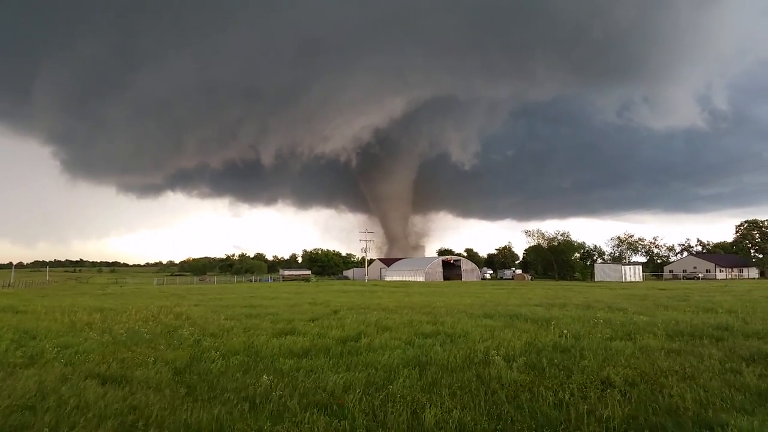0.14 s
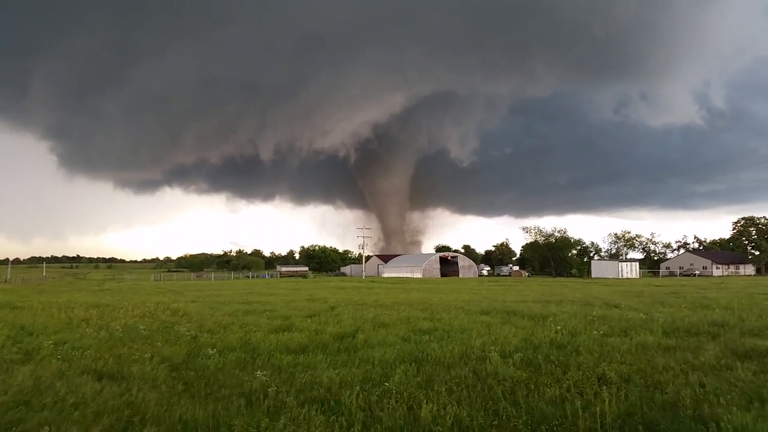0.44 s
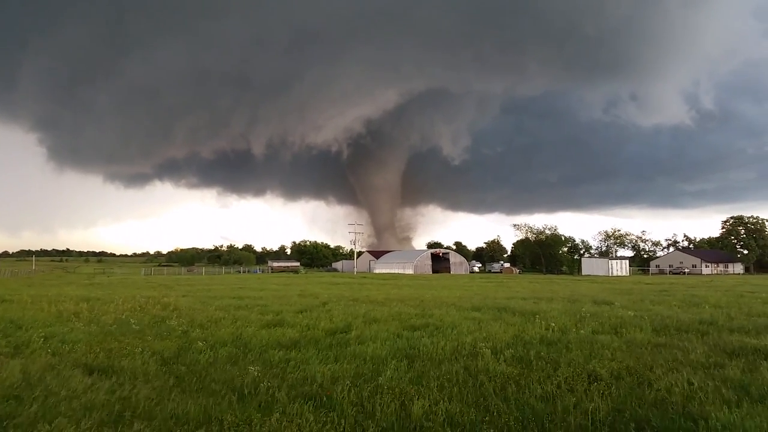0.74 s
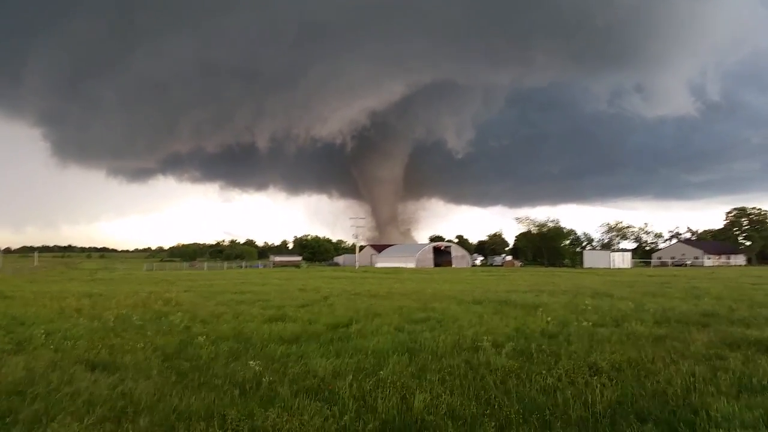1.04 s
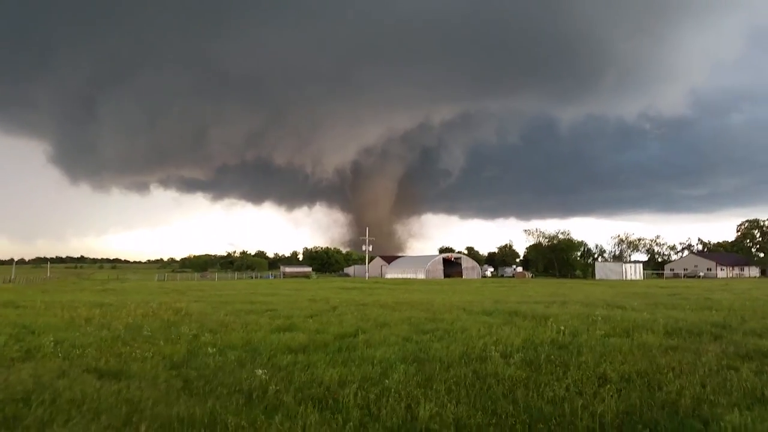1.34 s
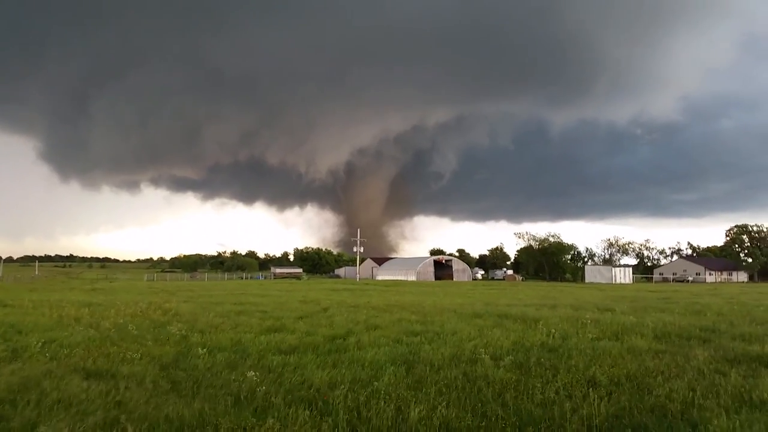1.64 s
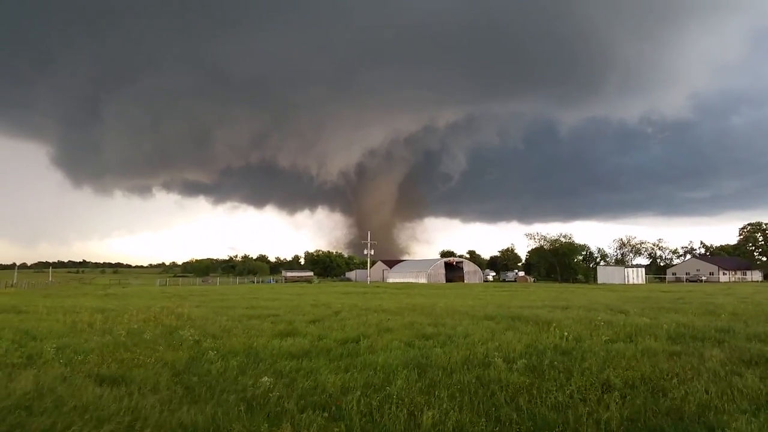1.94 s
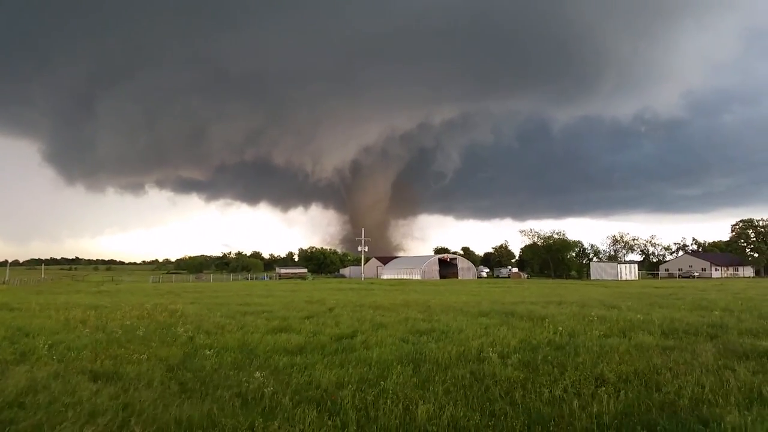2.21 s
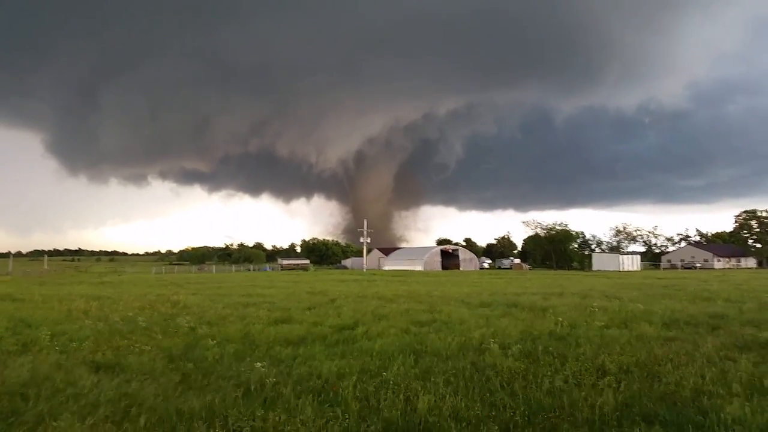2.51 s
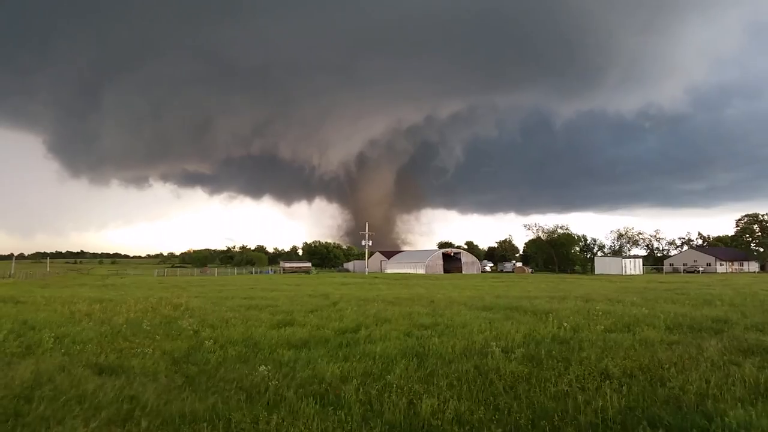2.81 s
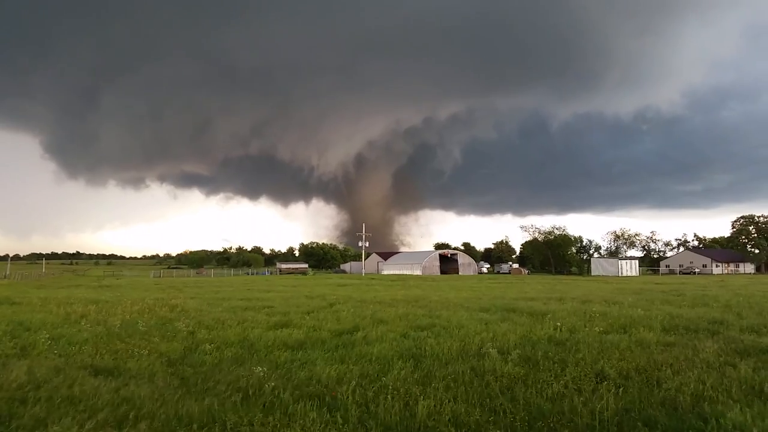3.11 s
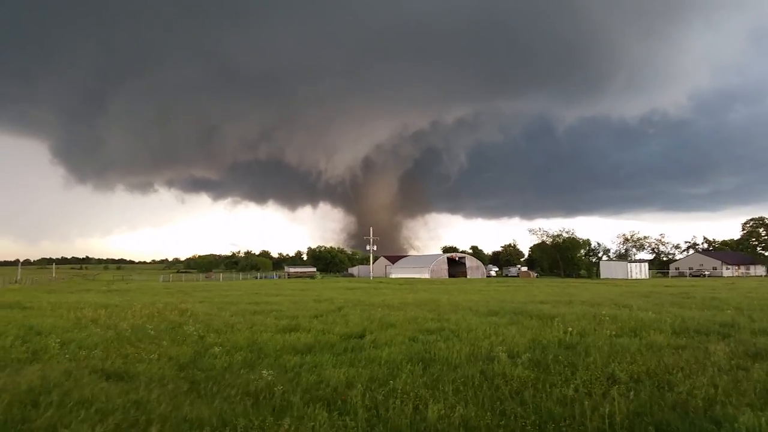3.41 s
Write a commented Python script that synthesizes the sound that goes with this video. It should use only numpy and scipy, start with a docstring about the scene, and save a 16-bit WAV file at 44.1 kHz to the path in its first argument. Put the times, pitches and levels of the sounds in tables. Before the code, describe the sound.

Wind noise dominates throughout: deep, uneven rumbling in both channels, often stronger on the right, with sharp buffets around 1.4, 2.5 and 2.8 seconds, over a soft rush across open farmland, easing at the end.

```python
"""Gusty storm wind crosses a hand-held camera in open farmland: each microphone port rumbles in its own
turbulence, made of coloured noise, and stronger wind adds a brighter flutter of random grains.
Single eddies slap a port with a low swing of pressure and a crackle of sharp kinks.
Behind it shaped noise makes the rush of wind over the field and a thin hiss that flares once to a sizzle.
One snap and a few ticks on the camera body are sudden starts that decay exponentially."""
import sys
import numpy as np
from scipy import signal
from scipy.fft import rfft, irfft
from scipy.io import wavfile
from scipy.ndimage import uniform_filter1d

SR = 44100
rng = np.random.default_rng(int(sys.argv[2]) if len(sys.argv) > 2 else 0)


def dump_mix(stems):
    """Bounce the given channels to the path in sys.argv[1] as a 16-bit WAV at rate SR."""
    frames = np.atleast_2d(stems).T  # one column per channel
    limited = np.clip(frames, -1, 1)  # hard clip at full scale
    pcm = np.round(limited * 32767).astype(np.int16)
    wavfile.write(sys.argv[1], SR, pcm)


N = 156996  # length in samples
TOP_HZ = 15800  # upper limit of the camera's sound


def undb(db):
    """Decibels to amplitude ratio: 20 dB is a factor of ten."""
    return 10 ** (np.asarray(db) / 20)


def curve(rows):
    """Linear interpolation: rows of (s, value) joined by straight lines."""
    return np.interp(np.arange(N) / SR, *np.array(rows).T)


def colour(x, points):
    """Spectral shaping by (Hz, dB) points, falling away outside them; keeps white noise at its level."""
    hz, db = np.array(points).T
    f = np.maximum(np.fft.rfftfreq(len(x), 1 / SR), 1)
    gain = undb(np.interp(np.log(f), np.log(hz), db))
    gain = gain * np.minimum(f / hz[0], 1) * np.minimum(hz[-1] / f, 1) ** 2
    return irfft(rfft(x) * gain / np.sqrt(np.mean(gain ** 2)), len(x))


def noise(points):
    """Coloured noise of level 1: white noise through a spectral shape."""
    return colour(rng.standard_normal(N), points)


def walk(hz):
    """Low-passed noise: smooth chance with spread 1 that changes about hz times a second."""
    f = np.fft.rfftfreq(N, 1 / SR)
    x = irfft(rfft(rng.standard_normal(N)) * np.exp(-(f / hz) ** 2), N)
    return x / x.std()


def even(x, span_s):
    """Division by the running power: holds the level near 1 over each span, leaving single swings free."""
    size = max(int(span_s * SR), 2)
    power = uniform_filter1d(uniform_filter1d(x ** 2, size), size)
    return x / np.sqrt(np.abs(power) + 1e-12)


def pan(db):
    """Intensity stereo: left and right gains for a level difference, at constant mean power."""
    gain = undb(np.array([[db], [-db]]) / 2)
    return gain / np.sqrt(np.mean(gain ** 2))


def fade(at_s, decay_s):
    """Exponential decay after a sudden start."""
    t = np.arange(N) / SR
    return (t >= at_s) * np.exp(-np.abs(t - at_s) / decay_s)


def port_wind(wind_db, flutter_db, flicker_db):
    """Turbulent pressure: large eddies rumble at a port; small ones flutter, riding on the large swings."""
    # Colour of the slow pressure swings. Each row: frequency in Hz, relative density in dB per Hz.
    rumble_colour = [(25, -11.5), (45, -1), (110, 1), (180, -5), (290, -13.5), (420, -26), (1500, -71.5)]
    # Colour of the fine flutter. Each row: frequency in Hz, relative density in dB per Hz.
    flutter_colour = [(100, -16.5), (250, 1), (380, 3.5), (600, -3.5), (1050, -17), (2000, -33),
                      (3000, -44.5), (5000, -70.5)]
    rumble_db, rumble_flicker_db, rumble_flicker_hz = 2, 3, 24.3
    breeze_db, flutter_growth = -13, 1.13  # reference wind strength; dB of flutter per dB of wind
    flutter_rate_hz = 70
    grains_per_s = 700  # tiny eddies that make up the flutter

    swings = even(noise(rumble_colour), span_s=0.025)
    surge = walk(rumble_flicker_hz)
    rumble = swings * undb(wind_db + rumble_db + rumble_flicker_db * surge)

    # spurts follow the surge in part and are softly limited to +-2
    spurts = 2 * np.tanh((.5 * surge + 0.61 * walk(flutter_rate_hz)) / 2)
    ride = np.sqrt(0.39 + 0.68 * swings ** 2)
    present = rng.random(N) < grains_per_s / SR
    grains = rng.standard_normal(N) * present * np.sqrt(SR / grains_per_s)
    level_db = flutter_db + flutter_growth * (wind_db - breeze_db) + flicker_db * spurts
    flutter = colour(grains, flutter_colour) * ride * undb(level_db)
    return rumble + flutter


def field():
    """Broadband turbulence noise: wind rushes over the open field, flickering in level on each side."""
    # Colour of the rush. Each row: frequency in Hz, relative density in dB per Hz.
    rush_colour = [(20, 8), (300, 7.5), (600, -14), (1000, -11), (1600, -15.5), (2500, -22.5), (4500, -53)]
    # Course of the rush. Each row: time in seconds, level in dB before flicker and panning.
    rush_db = [(0, -34), (.5, -42.5), (1.1, -37.5), (2.0, -40.5), (2.5, -37), (3.1, -44), (3.4, -54.5)]
    flicker_db, flicker_hz, left_over_right_db = 3.4, 20, 10.5
    sides = [noise(rush_colour) * undb(curve(rush_db) + flicker_db * walk(flicker_hz)) for _ in range(2)]
    return pan(left_over_right_db) * np.array(sides)


def hiss():
    """Amplitude-modulated noise: a thin hiss comes in puffs shared by both ports, each with its own colour."""
    # Course of the hiss. Each row: time in seconds, level in dB before flicker and port gain.
    puff_db = [(.3, -69), (.38, -78), (.88, -75.5), (1.2, -67.5), (1.68, -70), (1.94, -78.5), (2.1, -69),
               (2.26, -76.5), (2.36, -64.5), (2.6, -70), (2.7, -77.5), (3.25, -75.5), (3.45, -87.5)]
    # Colour at the left port. Each row: frequency in Hz, relative density in dB per Hz.
    left_colour = [(4600, -0.5), (5500, -12.5), (8000, -5.5), (9800, -18), (11800, -12), (15500, -19.5)]
    # Colour at the right port. Each row: frequency in Hz, relative density in dB per Hz.
    right_colour = [(3000, -11.5), (9600, -26), (11200, 1.5), (15800, -23.5)]
    left_db, flicker_db, flicker_hz = 0.5, 3, 32
    puffs = undb(curve(puff_db) + flicker_db * walk(flicker_hz))
    left = noise(left_colour) * puffs * undb(left_db)
    right = noise(right_colour) * puffs
    return np.array([left, right])


def buffets():
    """Pressure transients: an eddy swells and dies in milliseconds, a low swing with a crackle of kinks."""
    # Eddies that slap a port. Each row: centre in seconds, half length (to 1/e) in seconds,
    # relative thud level in dB, relative crackle level in dB, port (0 left, 1 right).
    eddies = [(0.143, .004, -11.5, -35.5, 1), (0.188, 0.0043, -6, -30.5, 0), (0.365, 0.001, -3, -21.5, 1),
              (0.398, 0.0035, -5.5, -40, 1), (0.41, 0.0046, -20.5, -28.5, 1), (0.601, 0.0042, -9, -42, 1),
              (1.054, 0.0079, -15, -35.5, 0), (1.289, 0.0028, -12, -29.5, 1), (1.313, 0.0053, -5, -34, 1),
              (1.389, 0.0032, 0.5, -30.5, 1), (1.602, 0.0068, -17.5, -28.5, 1),
              (1.6365, 0.0047, -16, -25.5, 1), (1.644, 0.003, -11.5, -28.5, 1),
              (1.733, 0.014, -15, -32.5, 1), (1.754, 0.0062, -14.5, -29, 1), (1.764, 0.0055, -18, -29, 1),
              (2.136, 0.0028, -13, -29, 1), (2.2694, 0.0027, -12.5, -22, 1), (2.4, 0.0061, -8, -29, 1),
              (2.42, 0.0076, -24, -28.5, 1), (2.447, 0.0053, -11.5, -28, 1),
              (2.5004, 0.0046, -9.5, -13.5, 1), (2.6124, 0.0025, -30, -21.5, 0),
              (2.624, 0.0033, -9, -25, 0), (2.64, 0.0028, -2, -29.5, 0), (2.7685, 0.0015, -6, -23.5, 1),
              (2.772, 0.00086, -18, -22.5, 1), (2.7755, 0.0013, -14.5, -20, 1),
              (2.7855, 0.0009, -15, -31, 1), (2.794, 0.004, -12.5, -27, 1), (2.903, 0.0066, -18, -32.5, 1),
              (2.932, 0.0013, -29.5, -32.5, 1), (3.543, 0.006, -15, -34, 0)]
    # Colour of the crackle. Each row: frequency in Hz, relative density in dB per Hz.
    crackle_colour = [(150, -2), (360, 5.5), (1000, -4), (1700, -11), (2700, -15.5), (4200, -31.5),
                      (7000, -59)]
    thud_hz, thud_s = 124, 0.0037  # mean pitch, shortest half length
    kink_gap_s, kink_size, grit_db = .0025, 1, -24  # spacing, size beside the central kink, noise between
    crackle_gain_db = 10.5
    # harder and shorter eddies crackle brighter
    base_edge_hz, edge_at_db, edge_db_per_octave = 2550, -20, 7.5

    t, out = np.arange(N) / SR, np.zeros((2, N))
    grit = rng.standard_normal(N) * undb(grit_db)
    order = np.arange(-6, 7)  # kinks counted from the central one
    chance = rng.standard_normal((len(eddies), 2, len(order)))
    swings = rng.random((len(eddies), 2))
    for eddy, (late, size), (octave, turn) in zip(eddies, chance, swings):
        at_s, half_s, thud_db, crackle_db, port = eddy
        near = np.abs(t - at_s) < .06
        age = t[near] - at_s

        pitch_hz = thud_hz * 2 ** (octave - .5)
        swing = np.sqrt(2) * np.cos(2 * np.pi * (pitch_hz * age + turn))
        thud = swing * np.exp(-(age / np.hypot(thud_s, half_s)) ** 2)

        # band-limited impulses; only the central kink has a fixed time and size
        when = kink_gap_s * np.where(order, order + late / 2, 0)
        kinks = np.sinc((age[:, None] - when) * SR) @ np.where(order, kink_size * size, 1)
        crackle = colour((kinks + grit[near]) * np.exp(-(age / half_s) ** 2), crackle_colour)
        octaves_up = (crackle_db - edge_at_db) / edge_db_per_octave
        edge_hz = min(base_edge_hz * 2 ** octaves_up * (kink_gap_s / half_s) ** 0.16, TOP_HZ)
        crackle = signal.sosfilt(signal.butter(2, edge_hz, fs=SR, output="sos"), crackle)
        crackle = crackle * np.sqrt(half_s * SR) / np.linalg.norm(crackle)  # level 1 over a half length

        out[round(port), near] += thud * undb(thud_db) + crackle * undb(crackle_gain_db + crackle_db)
    return out


def snap():
    """Step excitation: pressure jumps suddenly, then relaxes exponentially."""
    at_s, decay_s = 1.1401, 0.01
    level_db, left_over_right_db = -11.5, 16
    return pan(left_over_right_db) * undb(level_db) * fade(at_s, decay_s)


def ticks():
    """Impulsive excitation: each tiny dry tick on the camera body is noise with a very fast decay."""
    # Ticks on the body. Each row: start in seconds, level in dB before panning,
    # left-minus-right level in dB.
    body_ticks = [(1.1945, -44, 9), (1.2398, -32, 19), (1.59, -40, -12.5), (1.79, -41, -8.5),
                  (2.038, -45, -10)]
    # Colour of a tick. Each row: frequency in Hz, relative density in dB per Hz.
    tick_colour = [(2000, 8.5), (7000, -3), (11800, 4), (15500, -8.5)]
    decay_s = 0.00034
    out = np.zeros((2, N))
    grit = even(noise(tick_colour), span_s=.001)
    for at_s, level_db, left_over_right_db in body_ticks:
        out += pan(left_over_right_db) * undb(level_db) * grit * fade(at_s, decay_s)
    return out


def sizzle():
    """Noise burst under a bell-shaped envelope: the hiss flares at the right port in the hardest eddy."""
    # Colour of the sizzle. Each row: frequency in Hz, relative density in dB per Hz.
    sizzle_colour = [(2900, 1), (4100, 0), (5200, -27), (9500, -16.5), (11400, -4.5), (15000, -32)]
    at_s, half_s, level_db = 2.4995, 0.0021, -22.5  # half length is to 1/e
    age = np.arange(N) / SR - at_s
    right = noise(sizzle_colour) * undb(level_db) * np.exp(-(age / half_s) ** 2)
    return np.array([np.zeros(N), right])


def scene():
    """Superposition: the pressures of all sources add at the two ports."""
    # Wind strength at the left port. Each row: time in seconds, relative level in dB.
    wind_left = [(0, -15), (.13, -28.5), (0.179, -17.5), (.26, -22.5), (0.679, -25), (.87, -19.5),
                 (1.1, -15), (1.17, -24), (1.6, -19.5), (1.7, -28), (1.83, -21), (2.041, -33.5),
                 (2.098, -18.5), (2.409, -20), (2.502, -28.5), (2.57, -14), (2.639, -13), (2.68, -38),
                 (2.73, -20), (2.83, -37), (2.9, -25), (3.04, -31.5), (3.122, -12), (3.21, -29.5),
                 (3.3, -24), (3.43, -37.5), (3.549, -22)]
    # Wind strength at the right port. Each row: time in seconds, relative level in dB.
    wind_right = [(0, -8), (.06, -12.5), (.26, -18), (0.312, -24), (0.379, -16.5), (.54, -33.5),
                  (0.601, -19), (.68, -41), (0.721, -19), (0.781, -40.5), (.82, -12.5), (0.901, -27.5),
                  (0.958, -12.5), (1.12, -22), (1.17, -13), (1.419, -13.5), (1.66, -15.5), (1.69, -23),
                  (1.74, -13), (1.809, -26), (1.991, -20), (2.031, -35), (2.141, -16), (2.51, -14.5),
                  (2.69, -25), (2.77, -11.5), (2.819, -23), (2.89, -19), (3.08, -26), (3.55, -25)]
    # Flutter, left port then right. Each row: relative level at the reference wind strength in dB,
    # flicker in dB per unit of spurt.
    port_flutter = [(-29.5, 3), (-31.5, 7.5)]
    winds = zip((wind_left, wind_right), port_flutter)
    ports = np.array([port_wind(curve(wind), *flutter) for wind, flutter in winds])
    return ports + field() + hiss() + buffets() + snap() + ticks() + sizzle()


def record(dry):
    """Saturation and band limiting: the camera rounds the largest swings and cuts the top."""
    overload = 1  # amplitude that the rounded swings approach
    rounded = dry / (1 + (dry / overload) ** 4) ** (1 / 4)
    low_pass = signal.ellip(8, .2, 70, TOP_HZ, fs=SR, output="sos")  # ripple and stop band in dB
    return signal.sosfilt(low_pass, rounded)


dry = scene()
out = record(dry)
dump_mix(out)
```